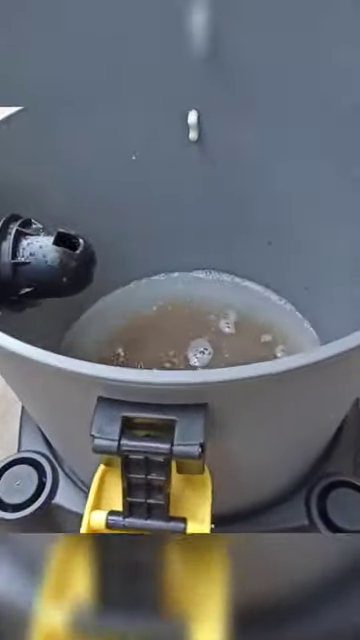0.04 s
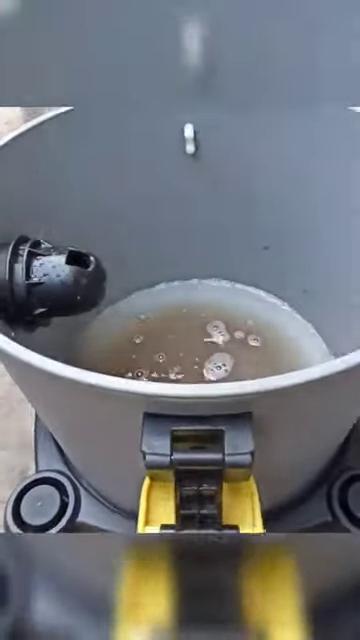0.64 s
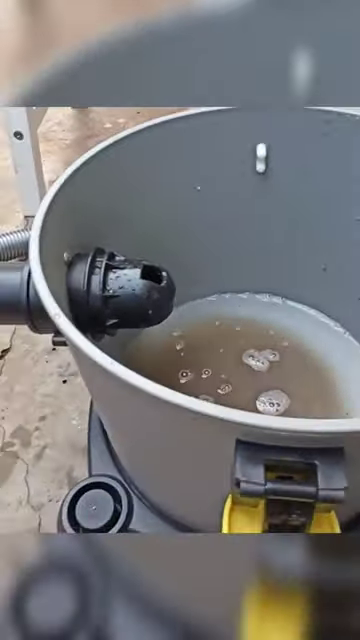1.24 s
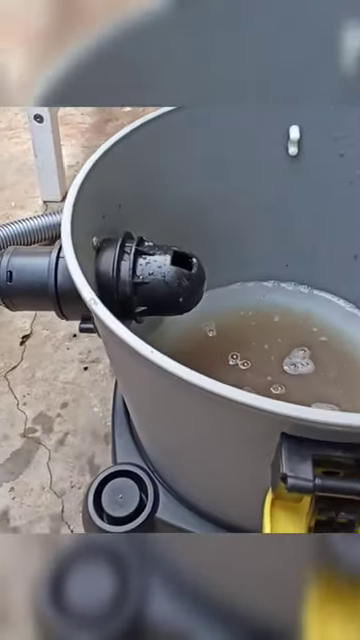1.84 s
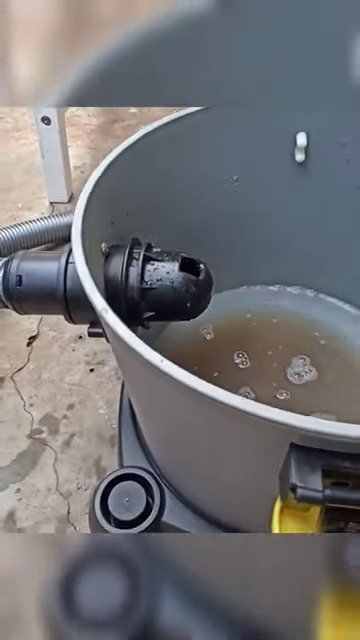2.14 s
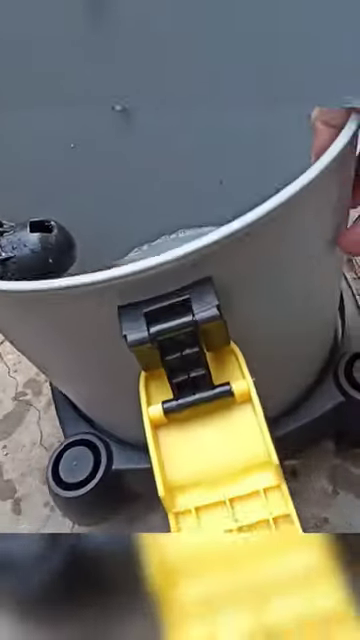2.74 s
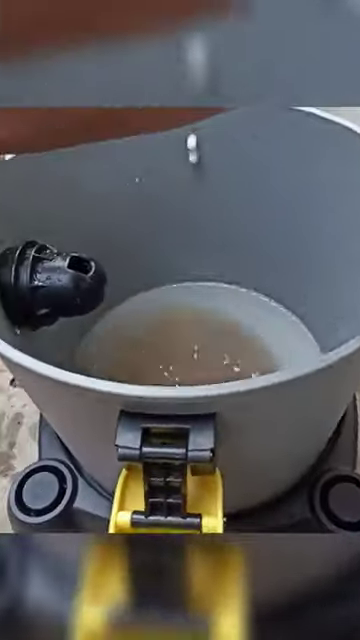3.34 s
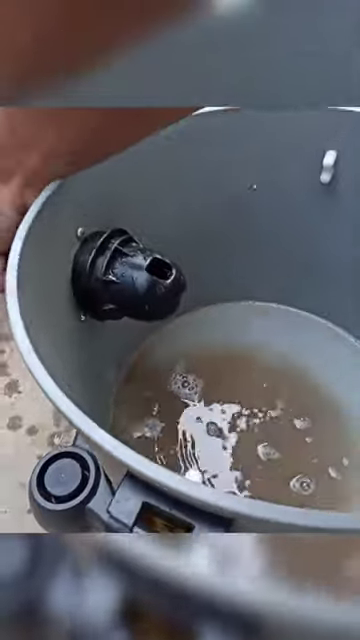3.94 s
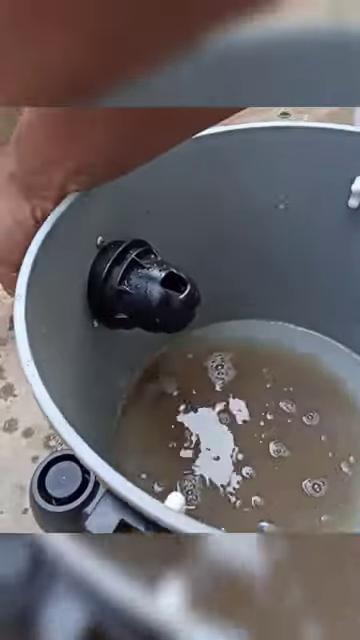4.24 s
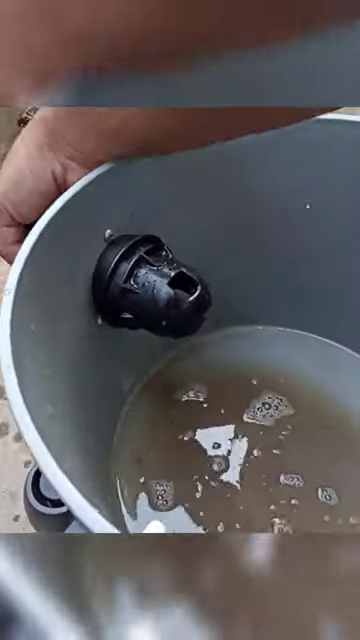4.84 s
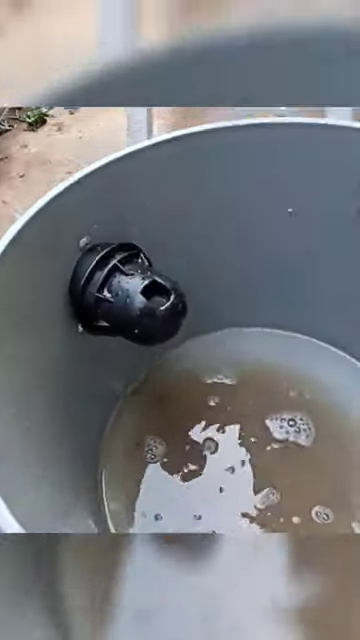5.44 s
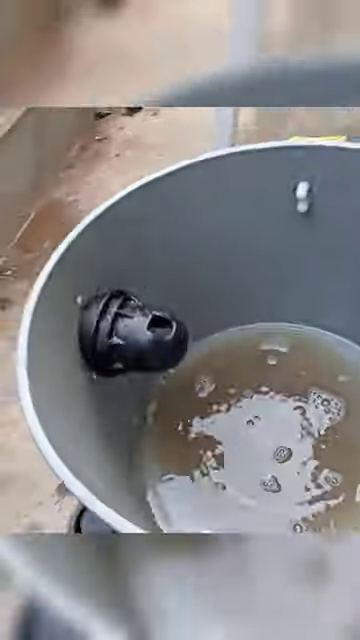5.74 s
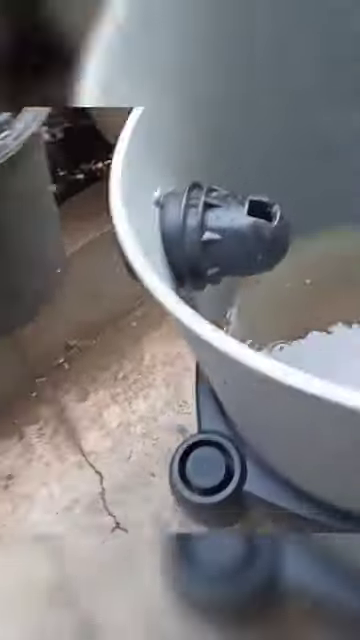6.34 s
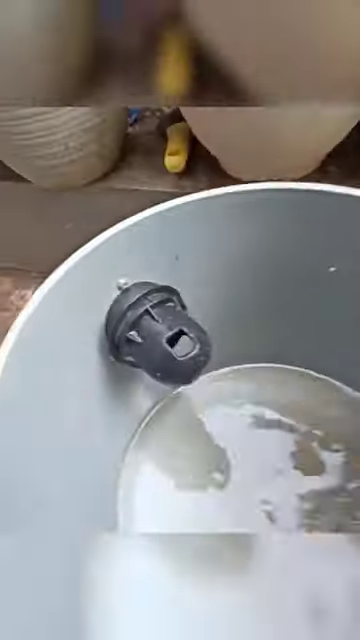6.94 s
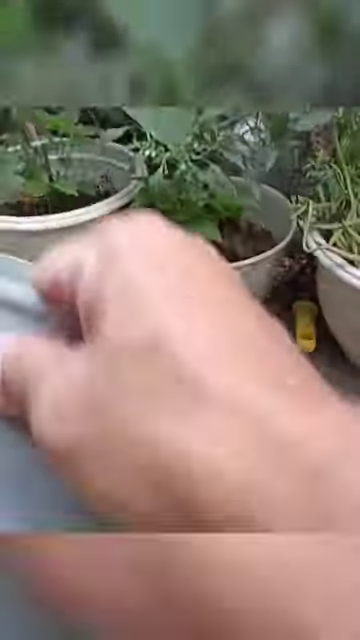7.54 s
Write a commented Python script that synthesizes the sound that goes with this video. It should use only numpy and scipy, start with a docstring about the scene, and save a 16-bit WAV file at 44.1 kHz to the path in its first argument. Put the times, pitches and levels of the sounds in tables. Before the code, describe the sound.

A plastic lid rattles on a vacuum cleaner drum, then hollow knocks, clicks and juddering wheels follow over a faint outdoor hiss.

```python
"""A plastic lid rattles on the rim of an open drum, over a steady outdoor hiss and a faint hum.
The drum belongs to a wet vacuum cleaner with a little water inside, and is being handled in a yard.
Water swishes, loose fittings click, and the wheels judder as the drum is pulled over concrete.
Every blow makes the drum boom and its wall ring briefly. Near the end an insect chirps thinly."""
import sys
import numpy as np
from scipy import signal
from scipy.io import wavfile
from scipy.ndimage import uniform_filter1d

SR = 44100
rng = np.random.default_rng(int(sys.argv[2]) if len(sys.argv) > 2 else 0)


def wrap_up_sound(samples):
    """Save the sound to the file named by the first command line argument, as 16-bit audio."""
    columns = np.atleast_2d(samples).T
    # keep every value between -1 and 1, then stretch to whole-number steps
    tamed = np.clip(columns, -1, 1)
    steps = np.round(tamed * 32767).astype(np.int16)
    wavfile.write(sys.argv[1], SR, steps)


N = 340011

# Tone colour of the ringing plastic wall: f/Hz, level/dB
WALL_COLOUR = [(100, -10.5), (450, 2.5), (700, 2), (1050, -0.5), (1750, -3), (3300, -10), (4000, -8),
               (5000, -10.5), (6500, -10), (8500, -25), (10000, -20), (12500, -15), (15500, -27)]
# Pitches at which the wall rings most: f/Hz, width/Hz, lift/dB
WALL_RESONANCES = [(850, 48, 8), (1330, 340, 7.5), (2035, 230, 7.5), (2286, 340, 7), (2620, 430, 4.5),
                   (2930, 770, 8), (3260, 88, 8)]
# Bright tone colour of clicks and swishes: f/Hz, level/dB
BRIGHT_COLOUR = [(150, -26), (450, 4.5), (1400, 8), (2200, 2.5), (3500, 0), (5000, -5.5), (6300, -1),
                 (8500, -16.5), (11000, -14), (12800, -5.5), (15500, -20)]
CRACK_DELAY_S = 0.001146  # the drum starts to boom this long before its wall cracks


def amp(db):
    """Turns decibels into a gain to multiply by."""
    return 10 ** (np.asarray(db) / 20)


def unit_level(x):
    """Scales a signal to an average (rms) level of 1."""
    return x / np.sqrt(np.mean(x ** 2) + 1e-20)


def curve_at(points, hz):
    """Joins a table's points along a pitch scale and gives the values at hz."""
    f, value = np.transpose(points)
    return np.interp(np.log(hz + 1), np.log(f + 1), value)


def add(mix, start_s, sound):
    """Mixes a sound in at the given time."""
    part = mix[:, max(round(start_s * SR), 0):][:, :sound.shape[1]]
    part += sound[:, :part.shape[1]]


def stereo(a, b, likeness):
    """Blends two unrelated noises into left and right; likeness 1 makes both the same."""
    likeness = np.clip(likeness, -1, 1)
    return np.array([a, likeness * a + np.sqrt(1 - likeness ** 2) * b])


def outdoor_hiss(level_db=1.0, patchy_db=.7, shimmer_db=1.6):
    """A steady outdoor hiss over a low rumble, with a faint artificial shimmer added above 8 kHz."""
    # Tone colour of the hiss: f/Hz, level/dB
    colour = [(20, -41), (50, -7.5), (83, 1.5), (130, -5), (195, -1.5), (400, -6.5), (620, -13.5),
              (950, -4.5), (2500, -12), (3500, -20), (5000, -33.5), (6500, -32), (9000, -48),
              (12500, -38.5), (15200, -51), (16000, -52)]
    # How alike left and right are: f/Hz, likeness (1 = the same)
    likeness = [(60, 1), (130, 0.97), (290, 0.93), (640, 0.61), (1410, -0.032), (3100, -0.083),
                (6820, -0.065), (15000, 0.11)]
    # How much louder the left is: f/Hz, level/dB
    balance = [(60, -1.5), (110, 2.5), (200, -1.5), (380, -1), (700, 0), (1290, 3.5), (2380, 7),
               (4400, 11.5), (8120, 5), (15000, -10.5)]
    # Slow drift in loudness: t/s, level/dB
    loudness = [(0, -41), (2, -40.7), (3.3, -41.2), (5.1, -42), (7.7, -42.5)]
    frames, hz = N // 512 + 5, np.fft.rfftfreq(2048, 1 / SR)
    a, b, c, d, patches = rng.standard_normal((frames, len(hz), 5)).T
    patches = uniform_filter1d(patches, size=20, axis=0)  # smooth over pitch
    patches = unit_level(uniform_filter1d(patches, size=10, axis=1))  # and over time
    shimmer = np.outer(hz > 8000, unit_level(uniform_filter1d(rng.standard_normal(frames), size=6)))
    spectrum = stereo(a + 1j * b, c + 1j * d, curve_at(likeness, hz)[:, None])
    spectrum *= amp(curve_at(colour, hz)[:, None] + patchy_db * patches + shimmer_db * shimmer)
    spectrum *= amp(np.outer([.5, -.5], curve_at(balance, hz)))[:, :, None]
    wash = signal.istft(spectrum, nperseg=2048, noverlap=1536)[1][:, :N]
    return unit_level(wash) * amp(level_db + np.interp(np.arange(N) / SR, *np.transpose(loudness)))


def knocks(rim_delay_s=0.0046):
    """The lid or a fitting lands on one side, then the other, and bounces; each hit also rings the rim."""
    # Hard hits on the drum: t/s, wall ring/dB, boom/dB, boom pitch/Hz, thud lift/dB,
    # hollow lift/dB, treble lift/dB, clack/dB, clack pitch/Hz
    hits = [(.001, -27, -22, 325, 2.5, -1, -9, -13, 1460), (.011, -33, -30, 312, 6, 5, -10, -29, 2620),
            (.021, -27, -25, 309, 1, -5, -7, -20, 1460), (.034, -34.5, -37, 300, -4, 5, 3.5, -17, 1330),
            (.042, -35.5, -22, 300, -12, 2, -12, -16, 3000),
            (0.0967, -22, -22, 300, -5, 9, -2.5, -14, 1350),
            (0.1054, -23.5, -36, 324, -9, -13, -8, -10.5, 2900),
            (0.126, -23, -17, 300, -11, -6, -11, -11, 3040),
            (0.1366, -30, -15.5, 293.4, -9, -5, -7, -6.5, 1330),
            (.148, -36, -31, 300, -3, 6, -3, -17, 3220), (.159, -45, -26.5, 285, 0, 12, -8, -19, 1330),
            (0.2135, -21.5, -31, 303, -3, 8, -9, -8, 1370), (0.2219, -25.5, -31, 290, -12, -1, 4, -9, 2910),
            (0.2405, -30, -32, 292, -4, -1, -6, -17, 3070), (0.2476, -24.5, -19, 294, -4, 4, -2, -10, 2810),
            (0.2662, -31.5, -21.5, 309, -2, 2, -15, -14, 1340),
            (0.3409, -28, -14, 295, -7, 4, -2, -15.5, 1330),
            (0.3484, -28.5, -16, 292.4, -4, 6, 3, -24, 2930), (.361, -27, -35, 304, 14, -7, -5, -27, 3220),
            (.372, -30, -17.5, 312, -1, 6.5, -1, -21, 1200),
            (.383, -36, -20.5, 306.5, 0, -3, -12, -26, 3000),
            (.397, -37, -29.5, 300, -9, 2, -16, -26, 2920),
            (.449, -22.5, -37, 308.4, -12, 6.5, -4, -10.5, 1450),
            (0.456, -27, -48, 303, 1, 0, 3.5, -11.5, 2680), (.471, -29, -30, 287, -10, 3, -14, -30, 2880),
            (.479, -31.5, -27, 296, -2, 1, -10, -25, 2290),
            (.486, -24, -16.5, 296, -1, -2, -13, -19.5, 3000),
            (.5145, -36, -20, 292, -9, 7, -1, -14.5, 1300), (0.573, -32, -13, 294, 0.5, 4, -4, -21, 1330),
            (.584, -26.5, -20.5, 299, -5, 1, -5, -15, 2920), (.601, -27, -19.5, 301, -7, 3, -17, -20, 1330),
            (.619, -22, -11.5, 320, -4, -5, -8, -9.5, 1370),
            (0.6305, -25, -18, 308, -10, -3, -3.5, -11.5, 2830),
            (.65, -26.5, -19, 304.6, -8, 3, -7, -8.5, 2970),
            (3.0125, -35, -29, 300, -8, -11, -8, -32, 1345),
            (3.0235, -34.5, -31, 310, 11, -14, -12, -21.5, 3350),
            (3.026, -33.5, -42, 308, -1, 1, -18, -15, 1310), (3.95, -21, -34, 313, -6, -7, -8, -7.5, 2212),
            (3.955, -36, -12, 312, -7.5, -6, -6, -15.5, 2500),
            (3.9694, -35.5, -24, 307.7, -8, 2, -7, -17, 3470),
            (4.589, -38.5, -30.5, 312, 3, 2, -11, -24, 2230),
            (5.3583, -20.5, -11, 310, -11, -5, 1.5, -14, 1420),
            (5.372, -29.5, -12.5, 308.5, -27, 0, 2, -2, 1273),
            (5.383, -55, -30, 296, -10, -4, -14, -23, 1310),
            (5.7624, -33, -30, 288, -4, -6.5, -22, -19, 2625),
            (5.849, -34, -25, 309, 6.5, -4, -1, -30, 1520), (5.8553, -26, -23, 350, -11, 1, 4, -10, 1680),
            (5.859, -23.5, -15, 305, -2, 0, -17, -4, 1600), (5.861, -34, -22, 309, -4, -15, -9, -7, 2540),
            (6.7342, -30, -25, 365, -14, -1.5, 8.5, -19, 1330),
            (6.7375, -27, -10, 351, -7.5, 4, -4, -10, 1315), (6.751, -28.5, -24, 354, 4, 5, -5, -18, 2260),
            (6.869, -28, -17, 325, 2, 1, -7, -14, 2860), (6.879, -31.5, -22, 315, 5, 7, -18, -14, 2070),
            (6.897, -30, -19, 313, 2, -8, -12, -15, 3000), (6.906, -34, -19, 320, -5, -2, -14, -19, 3050),
            (6.998, -33.5, -29.5, 337, 12, -3, -18, -17, 2080),
            (7.369, -37.5, -36, 294, -3, -14, -15, -25, 2160)]
    out, t = np.zeros((2, N)), np.arange(SR // 3) / SR
    for start, ring_db, boom_db, pitch_hz, thud_db, hollow_db, treble_db, clack_db, clack_hz in hits:
        add(out, start, amp(boom_db) * drum_boom(pitch_hz, t, thud_db))
        wall = wall_hit(t, ring_db, clack_db, clack_hz, hollow_db, treble_db, fade_s=0.052)
        add(out, start + CRACK_DELAY_S, wall)
        add(out, start + rim_delay_s, amp(ring_db) * rim_ring())
    return out


def drum_boom(pitch_hz, t, thud_db=0., damping_db_per_s=0., thud_below_hz=200, left_lag_s=.0002):
    """The drum's air and floor boom; the pitch shifts with the spot struck, and a grip damps it."""
    # Tones of the drum when it booms at 300 Hz: f/Hz, level/dB, 60 dB fade time/s
    tones = [(117.5, -26, 0.12), (144, -4.5, 0.074), (187, -7, 0.063), (300, 4, 0.11), (392, -1.5, 0.037),
             (480, 5.5, 0.01), (665, -19, 0.058)]
    t = np.maximum(t - np.array([[left_lag_s], [0]]), 0)
    boom = np.zeros_like(t)
    for hz, db, fade_s in tones:
        envelope = amp(db + thud_db * (hz < thud_below_hz) - 60 * t / fade_s)
        boom += envelope * np.sin(2 * np.pi * hz * pitch_hz / 300 * t)
    swell = 1 - np.exp(-t / 0.003)
    return boom * swell * amp(-damping_db_per_s * t) * amp([[-1.4], [1.4]])  # louder on the right


def wall_hit(t, ring_db, clack_db, clack_hz, hollow_db, treble_db, fade_s, left_lag_s=.00023):
    """The wall rings and the struck spot clacks on two close tones; a louder clack means a harder hit."""
    hardness = np.interp(clack_db, [-26, -6], [0, 1])
    response = plastic_response(WALL_COLOUR, WALL_RESONANCES, treble_db, hollow_db)
    wall = amp(ring_db) * plastic_ring(response, fade_s, t, hardness)
    wall[0] = np.pad(wall[0], (round(left_lag_s * SR), 0))[:len(t)]  # the left microphone is farther
    flex = clack(clack_hz, 0.022, t) + amp(-9.5) * clack(clack_hz * 1.12, 0.022, t)
    swell = 1 - np.exp(-t / 0.00063)
    return wall + amp(clack_db - 5.5) * flex * swell * amp([[4], [-4]])  # the spot faces left


def plastic_response(colour, resonances, treble_db=0., hollow_db=0.):
    """How the plastic answers one sharp tap; the spot struck makes it brighter or more hollow."""
    # How much louder the drum is on the left: f/Hz, level/dB
    balance = [(300, -2), (600, -3), (900, 1), (1400, 2), (2800, 5), (4200, 11.5), (5500, 2), (8000, 3),
               (10500, -10), (14500, -6)]
    hz = np.fft.rfftfreq(2048, 1 / SR)
    db = curve_at(colour, hz)
    db += sum(lift / (1 + (2 * (hz - f) / width) ** 2) for f, width, lift in resonances)
    db += treble_db * hz ** 4 / (hz ** 4 + 4800. ** 4)
    db += hollow_db / (1 + (hz / 1750) ** 8)
    log_gain = np.log(amp(db + np.outer([.5, -.5], curve_at(balance, hz))))
    # Turn the spectrum into a wave that starts at the tap, never before it.
    mirrored = np.hstack([log_gain, log_gain[:, -2:0:-1]])
    return np.fft.ifft(np.exp(signal.hilbert(mirrored).conj())).real


def plastic_ring(response, fade_s, t, hardness=0.95, tail_db=-22, tail_s=0.22, grainy_db=2, crack_db=14):
    """A crack, a blur of echoes inside the drum, then a faint tail from the yard."""
    grains = rng.standard_normal((2, len(t))) * amp(grainy_db * rng.standard_normal(len(t)))
    fade = amp(-60 * t / fade_s) + amp(tail_db - 60 * t / tail_s)
    rise_s = np.interp(hardness, [0, 1], [.003, .0006])  # a soft blow slides into contact
    drive = stereo(*grains, likeness=0.18) * fade * (1 - np.exp(-(t / rise_s) ** 2))
    drive[:, int(rise_s * SR)] += hardness * amp(crack_db)  # a hard one cracks at full contact
    sound = signal.fftconvolve(drive, response, axes=1)[:, :len(t)]
    bright_band = signal.sosfilt(signal.butter(2, (1800, 5000), "band", fs=SR, output="sos"), sound)
    return sound / np.std(bright_band[:, :SR // 100])  # its first 10 ms set the level


def clack(hz, fade_s, t):
    """A struck spot flexes to and fro, fading by 60 dB in fade_s."""
    return amp(-60 * t / fade_s) * np.sin(2 * np.pi * hz * t)


def rim_ring(spread_db=2.0):
    """A light touch rings the few tones of the rim, in a different mix each time."""
    # Tones of the rim: f/Hz, level next to the wall's ring/dB, 60 dB fade time/s
    tones = [(860, -3, 0.04), (1345, -6, 0.057), (2125, -23, 0.028), (2580, -8, 0.09), (2990, -14, 0.045),
             (3360, -10, 0.062)]
    t = np.arange(SR // 8) / SR
    ring = sum(amp(db - spread_db * rng.standard_normal((2, 1))) * clack(hz, fade_s, t)
               for hz, db, fade_s in tones)
    return ring * amp([[2], [-2]])  # louder on the left


def lid_landings(push_centre_s=0.00286, push_width_s=0.00083, boom_delay_s=.002):
    """Just after its edge touches, the lid's full weight pushes the drum, and the air inside booms."""
    # Landings of the lid: t/s, push/dB, boom/dB, boom pitch/Hz
    landings = [(0.0994, -5, -11, 300.6), (.2162, -6.5, -13, 302), (.4506, -8.5, -14.5, 297)]
    out, t = np.zeros((2, N)), np.arange(SR // 3) / SR
    offset = (t - push_centre_s) / push_width_s
    push = (1 - offset ** 2) * np.exp(-offset ** 2 / 2)  # the wall is pressed in and springs back
    for start, push_db, boom_db, pitch_hz in landings:
        add(out, start, amp(push_db) * push[None])
        add(out, start + boom_delay_s, amp(boom_db) * drum_boom(pitch_hz, t, thud_db=1))
    return out


def wander(t, steps_per_s):
    """A random curve that glides from one value to the next."""
    steps = np.arange(0, t[-1] + 1, 1 / steps_per_s)
    return np.interp(t, steps, rng.standard_normal(len(steps)))


def distant_hum(hz=82, wander_hz=7):
    """A faint, low hum that wanders in pitch."""
    # Rise and fall of the hum: t/s, level/dB
    loudness = [(0.8, -65), (1.3, -49), (2.0, -97), (2.6, -55), (3.0, -47.5), (3.8, -51), (4.3, -65),
                (5.2, -50), (6.2, -58), (7.7, -54)]
    t = np.arange(N) / SR
    pitch_hz = hz + wander_hz * wander(t, steps_per_s=8)
    hum = unit_level(np.sin(2 * np.pi * np.cumsum(pitch_hz) / SR))
    return amp(np.interp(t, *np.transpose(loudness))) * hum


def swishes(grainy_db=5.5):
    """Soft brushing and moving water make short swells of fine, grainy hiss."""
    # Swishes: middle t/s, level/dB, length/s, low edge/Hz
    swells = [(1.338, -46, 0.2, 2740), (2.121, -53, 0.039, 3500), (2.655, -58, 0.22, 6200),
              (3.711, -59, 0.14, 8000), (4.284, -49, 0.059, 6000), (4.333, -59, 0.098, 8000),
              (5.266, -52.5, 0.059, 5500), (5.432, -41, 0.043, 3500), (5.557, -42, 0.043, 3000),
              (5.685, -56, 0.094, 6000), (6.398, -62.5, 0.87, 3460), (6.884, -49, 0.11, 3300),
              (6.97, -60, 0.47, 9000), (7.354, -61, 0.98, 3500)]
    out = np.zeros((2, N))
    response = plastic_response(BRIGHT_COLOUR, [], treble_db=-2)
    for middle, db, length, low_hz in swells:
        count = int(length * SR)
        grains = rng.standard_normal((2, count)) * amp(grainy_db * rng.standard_normal(count))
        fizz = signal.fftconvolve(stereo(*grains, likeness=0.24), response, axes=1)[:, :count]
        fizz = signal.sosfilt(signal.butter(2, low_hz, "high", fs=SR, output="sos"), fizz)
        add(out, middle - length / 2, amp(db) * unit_level(fizz) * np.hanning(count))
    return out


def fitting_clicks(tap_db=-40, snap_db=-20, clack_cycles=18):
    """Small stiff parts snap brightly, with no boom; a harder snap is sharper and rings longer."""
    # Clicks of loose fittings: t/s, ring/dB, clack next to the ring/dB, treble lift/dB, clack pitch/Hz
    clicks = [(2.114, -47, 17, -19, 790), (2.127, -57.5, 27.5, -12, 480), (2.1714, -33.5, -1, -8, 393),
              (2.242, -54, 27, 4, 460), (2.244, -59.5, 31.5, -15, 830), (2.396, -56, -6, 16, 780),
              (2.928, -65, 22, 30, 990), (2.974, -45, -8, -18, 900), (3.016, -47.5, 14, 11, 1310),
              (3.815, -50.5, -3, -3, 860), (3.942, -39.5, -12, 0, 850), (4.008, -60.5, -2, 19, 1250),
              (5.5053, -21.5, 15.5, 3.5, 1390), (7.013, -60, -4, 31, 820), (7.229, -62, -4, 29, 820),
              (7.345, -63, -4, 25, 820)]
    # Peaks and dips in the fittings' tone: f/Hz, width/Hz, lift/dB
    resonances = [(393, 120, 9.5), (1370, 1500, -6.5), (4330, 170, -1), (4200, 190, 8)]
    out, t = np.zeros((2, N)), np.arange(SR // 4) / SR
    for start, db, clack_db, treble_db, hz in clicks:
        fade_s = np.interp(db, [tap_db, snap_db], [0.017, 0.063])
        hardness = np.interp(db, [tap_db, snap_db], [0.26, 0.95])
        response = plastic_response(BRIGHT_COLOUR, resonances, treble_db)
        ring = plastic_ring(response, fade_s, t, hardness, tail_db=-25)
        add(out, start, amp(db) * (ring + amp(clack_db) * clack(hz, clack_cycles / hz, t)))
    return out


def rolling_wheels(level_db=-5, jolts_per_s=1600, spread_db=3, spot_count=8, rise_s=0.032, stop_s=0.022):
    """Wheels jolt over grains of concrete; each jolt shakes the drum and ticks in a spot of its wall."""
    # Pushes of the drum: t/s, length/s, boom/dB, grit/dB, slowing/(dB per s), boom pitch/Hz
    pushes = [(2.457, 0.24, -38.5, -47.5, 8, 299), (2.921, 0.16, -36.5, -41, 9, 300),
              (5.388, 0.032, -23.5, -23, 2, 304), (5.428, 0.032, -27.5, -40, 0, 300),
              (5.75, 0.22, -24.5, -35, -24, 301.5), (6.101, 0.23, -39, -41, 17, 333),
              (6.755, 0.065, -26.5, -32.5, 5, 250), (6.839, 0.26, -17, -28.5, 38, 315),
              (7.113, 0.13, -30, -40.5, -13, 308), (7.24, 0.12, -33.5, -39, 10, 316),
              (7.344, 0.13, -28.5, -43.5, 22, 316), (7.475, 0.19, -34.5, -40.5, 65, 353)]
    out, t = np.zeros((2, N)), np.arange(N) / SR
    jolts = (rng.random(N) < jolts_per_s / SR) * rng.choice([-1., 1.], N)
    jolts *= amp(spread_db * np.minimum(rng.exponential(1, N), 3))
    spot = rng.integers(0, spot_count, N)
    response = plastic_response(WALL_COLOUR, WALL_RESONANCES, treble_db=-6.5)
    ticks = [plastic_ring(response, 0.036, t[:SR // 8]) for _ in range(spot_count)]
    jolts *= wheel_judder(t)
    grit = sum(signal.oaconvolve((jolts * (spot == k))[None], tick, axes=1)
               for k, tick in enumerate(ticks))
    grit = unit_level(grit[:, :N])
    for start, length, boom_db, grit_db, slowing, pitch_hz in pushes:
        moving = (t >= start) & (t < start + length + stop_s)
        age = t[moving] - start
        speed = np.clip(age / rise_s, 0, 1) * np.clip(1 - (age - length) / stop_s, 0, 1)
        speed *= amp(-slowing * np.clip(age, 0, length))  # negative slowing speeds it up
        one_boom = drum_boom(pitch_hz, t[:SR // 4], thud_db=-6, damping_db_per_s=18)
        boom = signal.fftconvolve(jolts[moving][None], one_boom, axes=1)[:, :len(age)]
        power = uniform_filter1d((boom ** 2).mean(0), size=SR // 16)
        boom /= np.sqrt(power + 1e-9)  # a steady push keeps the boom up
        add(out, start, speed * (amp(boom_db) * boom + amp(grit_db) * grit[:, moving]))
    return amp(level_db) * out


def wheel_judder(t, slips_per_s=34, unevenness=.3, fall_db=5.5):
    """The wheels stick and slip at an uneven rate; each slip starts strong and dies away."""
    rate = slips_per_s * np.exp(unevenness * wander(t, slips_per_s))
    return amp(-fall_db * (np.cumsum(rate) / SR % 1))


def soft_bumps():
    """A wheel or hand bumps the drum once, with a dull sound and no bounce."""
    # Bumps: t/s, wall ring/dB, boom/dB, boom pitch/Hz, boom damping/(dB per s)
    bumps = [(3.0225, -46, -21, 300, 600), (5.164, -41.5, -30, 320, 100), (5.935, -34.5, -42, 287, 100),
             (5.958, -40, -25, 293, 300), (6.202, -58, -30.5, 345, 100), (6.683, -36.5, -24, 298, 100),
             (6.699, -43, -27, 305, 200), (6.764, -35, -13.5, 261, 600), (6.841, -29, -24, 300, 300),
             (6.855, -32, -13.5, 312, 300), (6.918, -55, -20, 327, 400), (6.9438, -44, -10.5, 321, 600),
             (7.0414, -37.5, -17.5, 331, 200), (7.082, -57, -19, 300, 404), (7.384, -48, -24, 315, 100),
             (7.438, -42, -28, 334, 100)]
    out, t = np.zeros((2, N)), np.arange(SR // 3) / SR
    for start, ring_db, boom_db, pitch_hz, damping in bumps:
        clack_hz = rng.uniform(1200, 3000)  # each bump touches another spot
        add(out, start, amp(boom_db) * drum_boom(pitch_hz, t, damping_db_per_s=damping))
        wall = wall_hit(t, ring_db, ring_db + 6.5, clack_hz, hollow_db=1, treble_db=-10, fade_s=0.057)
        add(out, start + CRACK_DELAY_S, wall)
    return out


def insect(hz=13930, width_hz=200, length_s=.11, level_db=-2):
    """An insect among the plants chirps: thin whistles on one narrow, very high resonance."""
    # Chirps: middle t/s, level/dB
    chirps = [(6.33, -72), (6.41, -70), (6.51, -69), (6.65, -65), (6.8, -66), (6.95, -69), (7.08, -71),
              (7.2, -72), (7.53, -70), (7.62, -67)]
    out, t = np.zeros((2, N)), np.arange(int(length_s * SR)) / SR
    smoothing = signal.butter(2, width_hz / 2, fs=SR, output="sos")
    for middle, db in chirps:
        rasp = signal.sosfilt(smoothing, rng.standard_normal((2, len(t))))
        chirp = unit_level(rasp * np.sin(2 * np.pi * hz * t) * np.hanning(len(t)))
        add(out, middle - length_s / 2, amp(level_db + db) * chirp)
    return out


def scene():
    """The drum and its fittings, close by in the open air."""
    handling = knocks() + lid_landings() + soft_bumps() + rolling_wheels() + fitting_clicks() + swishes()
    return handling + outdoor_hiss() + distant_hum() + insect()


def record(dry, low_cut_hz=48, ceiling_db=3, high_cut_hz=16000):
    """The microphone drops deep bass, rounds off loud peaks and cuts the highest treble."""
    lean = signal.sosfilt(signal.butter(2, low_cut_hz, "high", fs=SR, output="sos"), dry)
    rounded = amp(ceiling_db) * np.tanh(lean / amp(ceiling_db))
    high_cut = signal.firwin(255, high_cut_hz, window=("kaiser", 9), fs=SR)
    return signal.oaconvolve(rounded, high_cut[None], "same")


dry = scene()
out = record(dry)
wrap_up_sound(out)
```